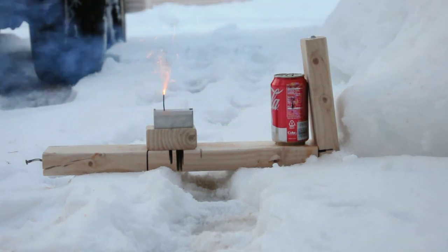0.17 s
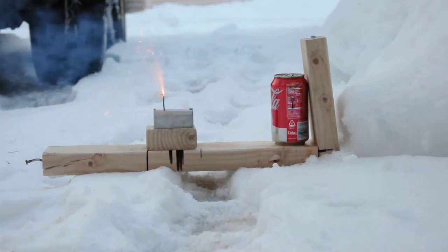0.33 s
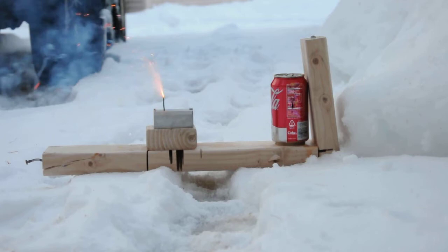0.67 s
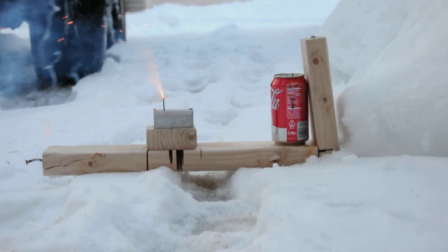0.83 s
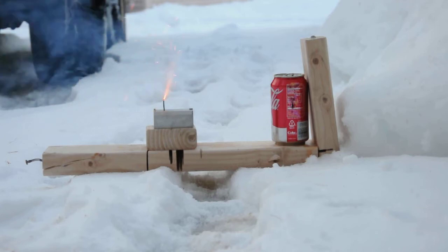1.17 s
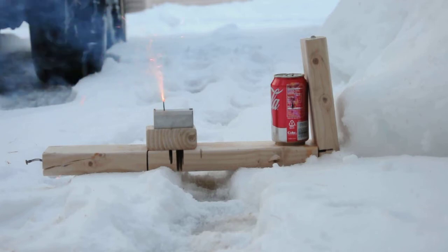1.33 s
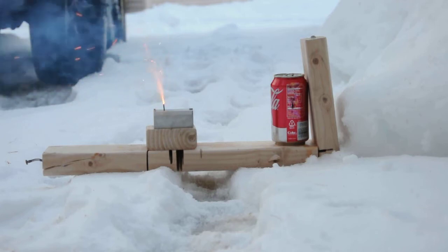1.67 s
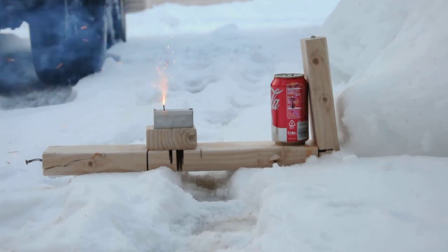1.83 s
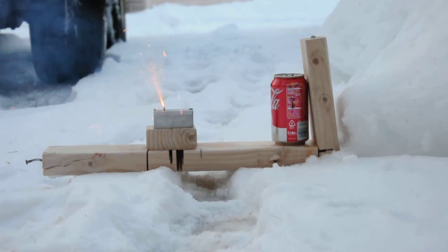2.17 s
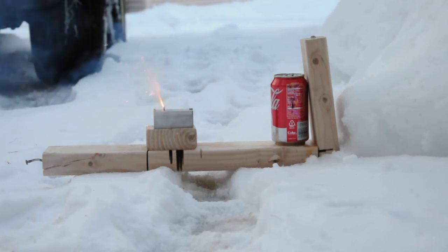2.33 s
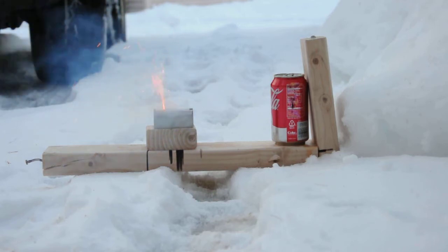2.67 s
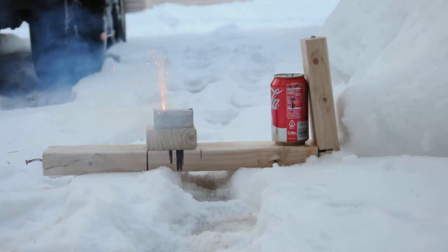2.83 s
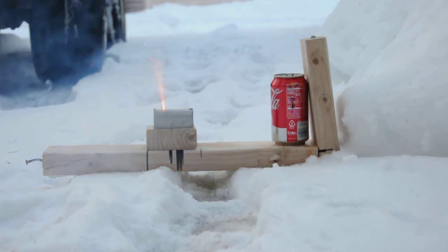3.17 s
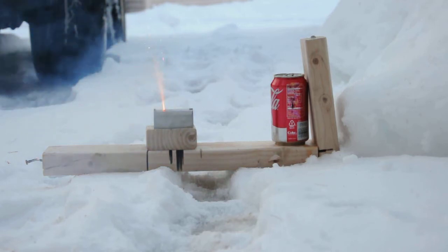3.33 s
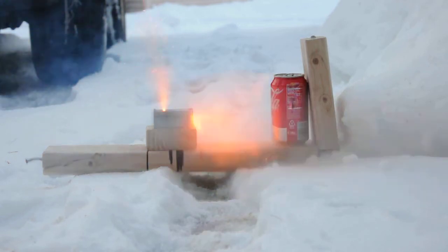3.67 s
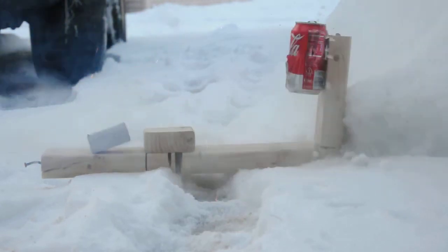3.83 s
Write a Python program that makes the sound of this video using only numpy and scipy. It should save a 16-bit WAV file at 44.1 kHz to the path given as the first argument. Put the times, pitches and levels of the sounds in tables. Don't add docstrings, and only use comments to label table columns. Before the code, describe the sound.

A small cannon fires in a snowy yard. From 0 s a fuse hisses quietly, crackling and spitting, its airy whistle growing after 1 s; a dull hollow thud sounds far off at 0.2 s over faint motor hum and quiet air. Around 3.61 s powder puffs and gas spurts, then at 3.66 s a huge crack and blast distort the microphone, followed by slaps, wooden clatter and rolling echoes until about 4 s.

```python
import sys
import numpy as np
from scipy import signal
from scipy.fft import rfft, irfft
from scipy.io import wavfile

SR = 44100
rng = np.random.default_rng(int(sys.argv[2]) if len(sys.argv) > 2 else 0)


def wav_record(signal):
    frames = np.transpose(np.atleast_2d(signal))
    bounded = np.clip(frames, -1, 1)
    quanta = np.round(bounded * 32767).astype(np.int16)
    wavfile.write(sys.argv[1], SR, quanta)


def invert_db(x):
    u = np.asarray(x, float) / 20
    return 10 ** u


N = 176400

# (time [s], level [dB], whistle share [dB])
FUSE_BURN = [(0, -39, -17.5), (.47, -40.5, -13), (.68, -37.5, -11), (.74, -40.5, -10), (.81, -35.5, -11),
             (.88, -43, -34), (1.02, -38.5, -3), (1.08, -40.5, -4.5), (1.35, -39.5, -8), (1.75, -39.5, -4),
             (2.0, -39.5, -6), (2.21, -41, -4.5), (2.36, -40.5, -5.5), (2.62, -42.5, -7.5),
             (2.68, -41.5, -0.5), (3.0, -39, 0), (3.299, -40, -2), (3.6, -41, 1)]
# (time [s], peak level [dB])
FUSE_SPITS = [(0.299, -31), (.39, -33), (.58, -31), (.66, -36), (.92, -30), (1.0, -27), (1.29, -24.5),
              (1.376, -33), (1.475, -28), (1.59, -33), (1.69, -31), (1.765, -28.5), (1.915, -39),
              (2.274, -26.5), (2.35, -28), (2.64, -34), (2.85, -34), (2.99, -30), (3.111, -32),
              (3.2, -30.5), (3.42, -43), (3.51, -40)]
# (frequency [Hz], density [dB per Hz])
JET_SPECTRUM = [(900, -21), (1400, -11.5), (1750, -2.5), (2000, -1), (2200, 1), (3500, 2), (4500, -3),
                (7000, 3.5)]
# (low edge [Hz], high edge [Hz])
WHISTLE_BAND = (3190, 5710)
# (lag [s], pressure share [1])
FLAME_REFLECTIONS = [(0.0025, -0.07), (0.00276, 0.14), (0.00391, 0.15), (0.00434, 0.07), (0.00501, -0.1),
                     (0.00549, -0.08), (0.0057, 0.13), (0.00789, -0.09), (0.00812, 0.07), (0.01336, -0.06)]

# (time [s], level [dB], rise [s], hold [s])
VENT_BURSTS = [
    (3.649, -21, .004, .004),
    (3.6568, -11, .0005, .003),
    (3.6605, -4, .0005, .002),
]
# (frequency [Hz], density [dB per Hz])
CRACK_SPECTRUM = [(60, -31.5), (150, -15.5), (400, -1), (1700, -3.5), (2900, -7), (4300, -14), (7000, -7.5)]
# (frequency [Hz], density [dB per Hz])
ROLL_SPECTRUM = [(40, -39), (130, -15), (250, -14.5), (380, -5), (1050, -7), (1600, -11.5), (3000, -16),
                 (7000, -30.5)]
# (time [s], peak level [dB], bright share [dB])
YARD_ECHOES = [(3.703, -32, -11), (3.722, -22, -12), (3.753, -23, -13), (3.767, -21.5, -1.5),
               (3.806, -18.5, -2.5), (3.813, -18.5, 0), (3.833, -18, 0.5), (3.877, -19.5, -5),
               (3.915, -28, -5), (3.942, -24.5, 1), (3.956, -33, 1), (3.967, -21, 3)]
# (time [s], peak level [dB], width [s])
BLAST_SLAPS = [
    (3.7045, -10, 0.00042),
    (3.7107, -11.5, 0.0031),
    (3.7172, -3.5, 0.0015),
    (3.9091, -13, 0.0007),
    (3.9685, -15.5, .001),
]

# (time [s], peak level [dB])
THUD_BLOWS = [
    (0.2161, -28),
    (0.2197, -24.5),
    (.2258, -22),
    (0.2372, -35),
    (.343, -39),
    (.385, -38.5),
]
# (frequency [Hz], level [dB], T60 [s])
BODY_MODES = [(270, -3.5, 0.033), (470, 0, 0.032), (620, -11.5, 0.04), (730, -9.5, 0.05),
              (994, -7.5, 0.026), (1470, -12, .02)]
# (frequency [Hz], rms level [dB])
MOTOR_PARTIALS = [(59.2, -66.5), (118.4, -70), (177.6, -66), (242.2, -61)]
# (frequency [Hz], density [dB per Hz])
AIR_SPECTRUM = [(25, -29.5), (55, -11.5), (100, -12), (145, -13.5), (260, -4.5), (900, -5.5), (1350, -11.5),
                (2500, -6)]

# (time [s], length [s], gain [dB])
CAPSULE_DROPOUTS = [(3.6701, .0007, -15), (3.6828, .002, -12), (3.6922, .003, -21), (3.7, .0024, -20),
                    (3.7074, .0014, -15)]
# (frequency [Hz], gain [dB])
RECORDER_RESPONSE = [(4600, -1), (5100, -6), (5500, -11), (5850, -22), (6050, -31), (6270, -47),
                     (6330, -66.5), (6500, -120)]

SPIT_RISE_S, SPIT_FALL_S, SPIT_DB = .006, .015, -18
SPARKS_PER_S, SPARK_DB = 630, -17.5
FLASH_S, FLASH_RISE_S, FLASH_DB, FLASH_HISS_DB = 3.614, .01, -34, -34
SHOT_S, SHOT_RISE_S, SHOT_HOLD_S = 3.6604, .0012, .0074
CRACK_DB, CRACK_T60_S = -2, .012
BLAST_DB, BLAST_T60_S = -8, .13
ROLL_DB, ROLL_T60_S = -18.5, 1.59
ECHO_DB, ECHO_T60_S = -5, 0.063
THUD_TAIL_DB, THUD_TAIL_T60_S = -39.5, 0.76
AIR_DB = -46.5
ROAR_FOLLOWS = 0.05
SKEW, SKEW_T60_S = 2.5, .14
CAPSULE_TOP, AMPLIFIER_TOP = .72, .725


def rms_one(x):
    return x / np.sqrt(np.mean(x ** 2) + 1e-20)


def drift(rate):
    pole = np.exp(-80 * np.pi * rate / SR)
    white = rng.standard_normal(N // 40 + 2002)
    slow = signal.lfilter([1], [1, -2 * pole, pole * pole], white)[2000:]
    return np.interp(np.arange(N) / 40, np.arange(len(slow)), rms_one(slow))


def colour(x, spectrum):
    hz, db = np.transpose(spectrum)
    grid = np.arange(N // 2 + 1) * SR / N + 1
    gain_db = np.interp(np.log(grid), np.log(hz), db, left=-70, right=-70)
    return rms_one(irfft(rfft(x) * invert_db(gain_db), N))


def band(low_hz, high_hz, x):
    sos = signal.butter(2, [low_hz, high_hz], "band", fs=SR, output="sos")
    return signal.sosfilt(sos, x)


def patchy(spectrum, patchy_db, rate):
    out, together = 0, drift(rate)
    edges = 25 * 2 ** np.arange(0, 8.4, 1 / 3)
    noises = [colour(white, spectrum) for white in rng.standard_normal((2, N))]
    for k, (low, high) in enumerate(zip(edges, edges[1:])):
        flicker_db = patchy_db * (together + 0.44 * drift(rate))
        out = out + band(low, high, noises[k % 2]) * invert_db(flicker_db)
    return rms_one(out)


def burst(start, rise, hold, t60):
    t = np.arange(N) / SR - start
    decay = invert_db(-60 * np.maximum(t - rise - hold, 0) / t60)
    return np.clip(t / rise, 0, 1) ** 2 * decay


def fuse():
    s, db, whistle_db = np.transpose(FUSE_BURN)
    t = np.arange(N) / SR
    firing = rng.random(N) < SPARKS_PER_S / SR
    strength = invert_db(4.6 * np.minimum(rng.exponential(1, N), 3.5))
    sparks = firing * strength * rng.choice([-1, 1], N)
    jet = patchy(JET_SPECTRUM, patchy_db=.7, rate=16.0) + invert_db(SPARK_DB) * colour(sparks, JET_SPECTRUM)
    whistle = rms_one(band(*WHISTLE_BAND, rng.standard_normal(N)))
    jet = jet + invert_db(np.interp(t, s, whistle_db) + 2.1 * drift(36.0)) * whistle
    spits = sum(invert_db(peak_db + SPIT_DB) * burst(peak_s - SPIT_RISE_S, SPIT_RISE_S, .008, 7 * SPIT_FALL_S)
                for peak_s, peak_db in FUSE_SPITS)
    return jet * (invert_db(np.interp(t, s, db)) + spits)


def reflected(x):
    hz = np.arange(N // 2 + 1) * SR / N
    paths = 1 + sum(share * np.exp(-2j * np.pi * hz * lag) for lag, share in FLAME_REFLECTIONS)
    return irfft(rfft(x) * paths, N)


def cannon():
    bright = colour(rng.standard_normal(N), CRACK_SPECTRUM)
    dull = colour(rng.standard_normal(N), ROLL_SPECTRUM)
    puff = invert_db(FLASH_DB) * rms_one(band(200, 910, dull))
    hiss = invert_db(FLASH_HISS_DB) * rms_one(band(1800, 7100, bright))
    flash = burst(FLASH_S, FLASH_RISE_S, .02, .2) * (puff + hiss)
    spurts = sum(invert_db(db) * burst(s, rise, hold, 0.0044) for s, db, rise, hold in VENT_BURSTS)
    vent = spurts * rms_one(band(2100, 5200, rng.standard_normal(N)))
    crack = invert_db(CRACK_DB) * burst(SHOT_S, SHOT_RISE_S, SHOT_HOLD_S, CRACK_T60_S) * bright
    blast_s = SHOT_S + SHOT_HOLD_S
    mixed = np.roll(.8 * bright + .7 * dull, N // 2)
    blast = invert_db(BLAST_DB) * burst(blast_s, .002, .012, BLAST_T60_S) * mixed
    rolling = patchy(ROLL_SPECTRUM, patchy_db=0.0, rate=92.0)
    roll = invert_db(ROLL_DB) * burst(blast_s, 0.0041, 0, ROLL_T60_S) * rolling
    echoes = sum(invert_db(db + ECHO_DB) * burst(s, 0.0019, 0.0014, ECHO_T60_S) * (dull + invert_db(bright_db) * bright)
                 for s, db, bright_db in YARD_ECHOES)
    return flash + vent + crack + blast + roll + echoes


def slaps():
    t = np.arange(N) / SR
    waves = sum(invert_db(db) * (1 - 2 * (t - s) / width) * (t > s) * (t < s + width)
                for s, db, width in BLAST_SLAPS)
    return band(150, 4000, waves)


def thud():
    ringing = np.zeros(N)
    for hz, db, t60 in BODY_MODES:
        clicks = np.full(N, 1e-18)
        for s, peak_db in THUD_BLOWS:
            clicks[int(s * SR)] = invert_db(peak_db + db + rng.normal(0, 3.2))
        r, w = invert_db(-60 / (t60 * SR)), 2 * np.pi * hz / SR
        ringing += signal.lfilter([0, np.sin(w)], [1, -2 * r * np.cos(w), r * r], clicks)
    dull = rms_one(band(145, 760, rng.standard_normal(N)))
    tail = invert_db(THUD_TAIL_DB) * burst(THUD_BLOWS[0][0], 0.0042, 0, THUD_TAIL_T60_S) * dull
    return band(160, 1500, ringing) + tail


def motor():
    t = np.arange(N) / SR
    return sum(np.sqrt(2) * invert_db(db + 1.2 * drift(3.0)) * np.sin(2 * np.pi * hz * t + rng.uniform(0, 5))
               for hz, db in MOTOR_PARTIALS)


def yard():
    s, _, whistle_db = np.transpose(FUSE_BURN)
    grow_db = ROAR_FOLLOWS * (np.interp(np.arange(N) / SR, s, whistle_db) - whistle_db.mean())
    return invert_db(AIR_DB + grow_db) * patchy(AIR_SPECTRUM, patchy_db=1.57, rate=1.67)


def scene():
    return (reflected(fuse()) + cannon() + slaps() + thud() + motor() + yard())[None]


def roll_off(x):
    return signal.sosfilt(signal.butter(12, 15750, fs=SR, output="sos"), x)


def record(dry):
    t, shaken_s = np.arange(N) / SR, SHOT_S + SHOT_RISE_S + SHOT_HOLD_S
    lean = np.abs(dry) * np.tanh(np.abs(dry) / .2) * .5
    x = dry + SKEW * burst(shaken_s, .001, .03, SKEW_T60_S) * lean
    x = np.where(t > shaken_s, CAPSULE_TOP * np.tanh(x / CAPSULE_TOP), x)
    high_pass = signal.butter(2, 200, "high", fs=SR, output="sos")
    x = signal.sosfilt(high_pass, x - dry) + dry
    for s, length, db in CAPSULE_DROPOUTS:
        x = x * invert_db(db * np.clip(np.minimum(t - s, s + length - t) / .0004, 0, 1))
    hz = np.arange(N // 2 + 1) * SR / N
    x = irfft(rfft(x) * invert_db(np.interp(hz, *np.transpose(RECORDER_RESPONSE))), N)
    return roll_off(np.clip(x, -AMPLIFIER_TOP, AMPLIFIER_TOP))


dry = scene()
out = record(dry)
wav_record(out)
```